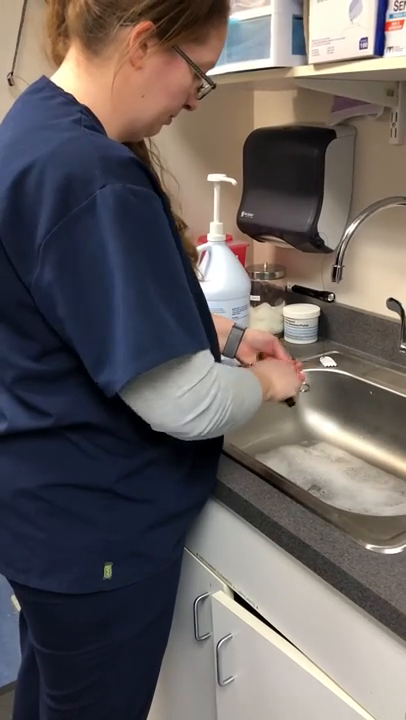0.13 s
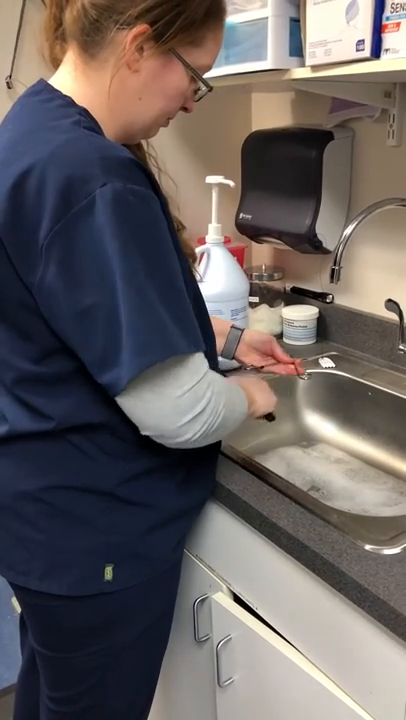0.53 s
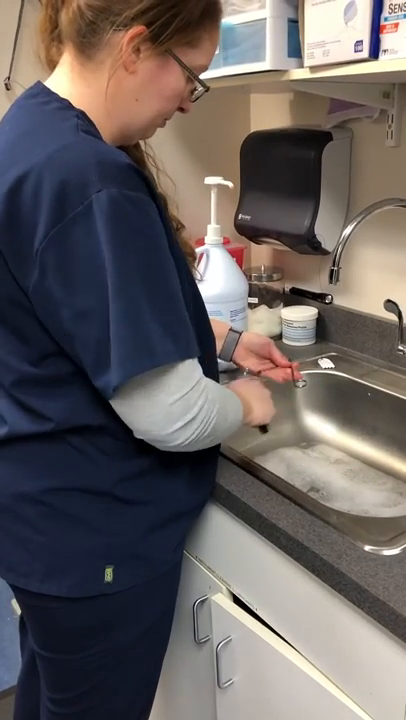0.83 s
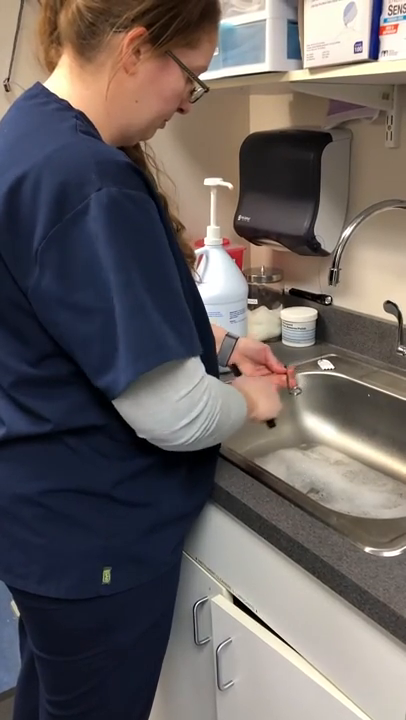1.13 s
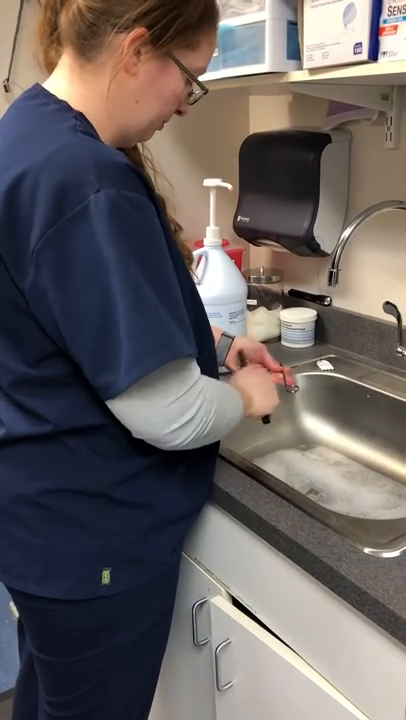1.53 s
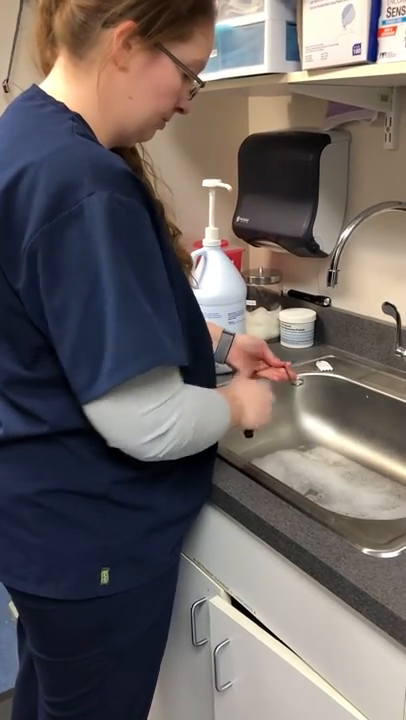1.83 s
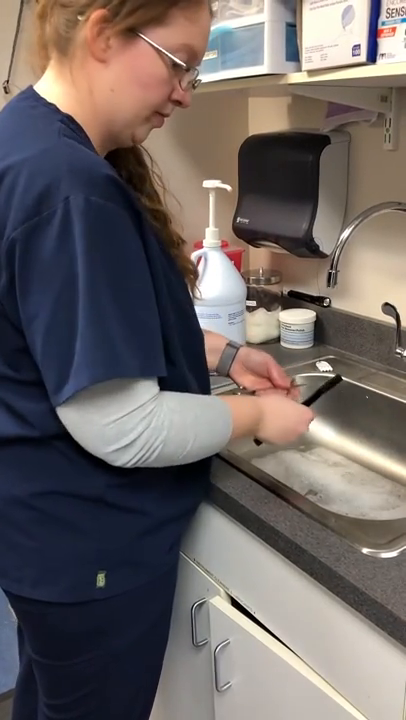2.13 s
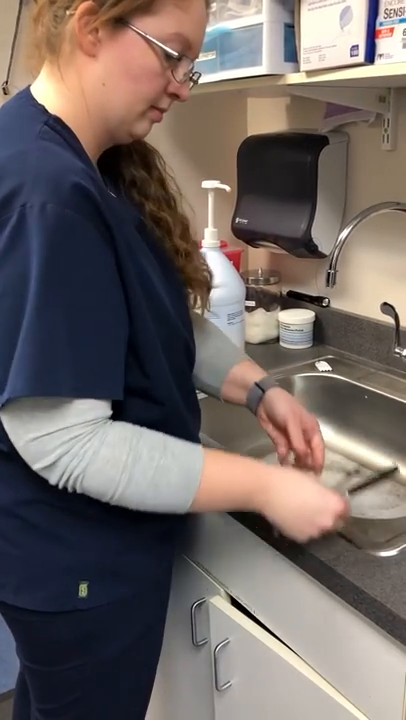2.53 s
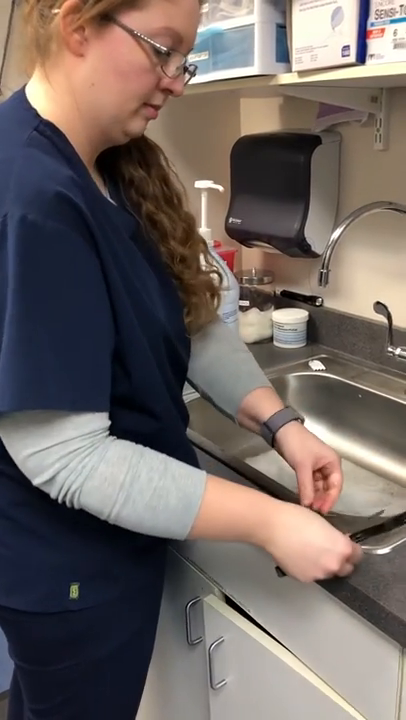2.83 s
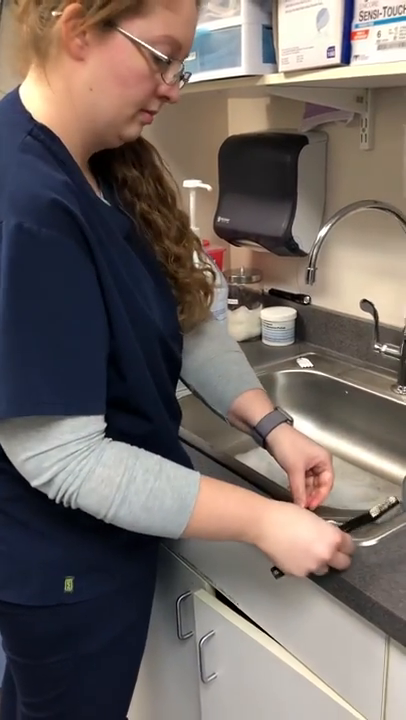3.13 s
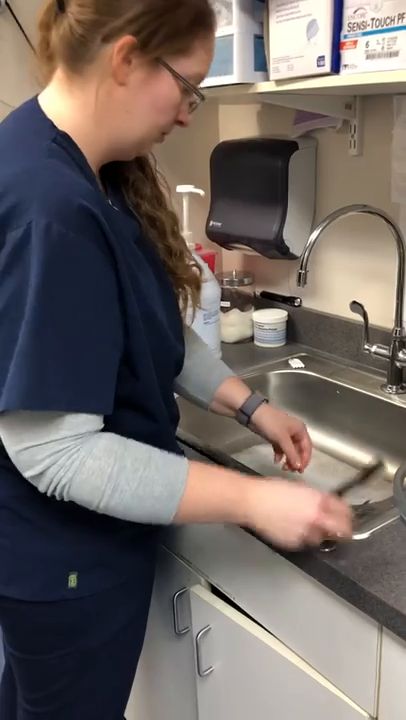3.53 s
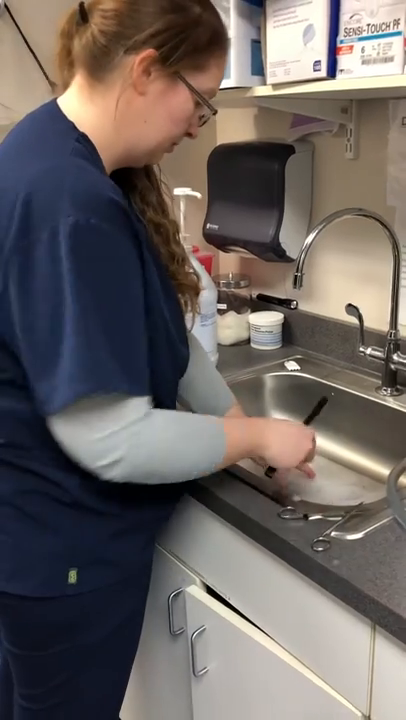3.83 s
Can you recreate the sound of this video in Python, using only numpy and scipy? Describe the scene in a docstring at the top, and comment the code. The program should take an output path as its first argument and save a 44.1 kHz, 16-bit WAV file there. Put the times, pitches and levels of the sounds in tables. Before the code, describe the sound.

Short raspy brush strokes on small metal, then a sharp ringing clatter beside a sink.

```python
"""In a small hard room with humming ventilation, a small steel instrument is scrubbed with a brush over a sink.
The brush is shaped noise: short bursts with a bristle resonance, light touches and dull taps.
Sleeves rustle as filtered noise; the instrument then clatters down on the counter beside the sink.
Its knocks are decaying noise bursts, with decaying sines for the ringing steel and sink."""
import sys
import numpy as np
from scipy import signal
from scipy.fft import rfft, irfft
from scipy.io import wavfile
from scipy.ndimage import uniform_filter1d

SR = 44100
rng = np.random.default_rng(int(sys.argv[2]) if len(sys.argv) > 2 else 0)


def output_pcm(signal):
    """Save a mono or channel-first signal as 16-bit PCM at the path in sys.argv[1].

    Samples are clipped to [-1, 1] before scaling.
    """
    pcm = np.clip(np.atleast_2d(signal).T, -1, 1) * 32767
    wavfile.write(sys.argv[1], SR, np.round(pcm).astype(np.int16))


N = 176400  # 4 seconds


def undb(db):
    """Decibels to gain."""
    return 10 ** (np.asarray(db) / 20)


def unit(x):
    """Scale to rms 1."""
    return x / np.sqrt(np.mean(x ** 2))


def decay(age, t60):
    """Exponential decay by 60 dB in t60 seconds."""
    return np.exp(-np.log(1000) * age / t60)


def fade(start, t60):
    """Sudden onset and exponential decay."""
    age = np.arange(N) / SR - start
    return (age >= 0) * decay(np.clip(age, 0, 10 * t60), t60)


def curve(rows):
    """Gain over time from (seconds, dB) points."""
    return undb(np.interp(np.arange(N) / SR, *np.array(rows).T))


def surges(depth_db, step_s):
    """A gain that wanders at random between points step_s apart, with rms 1."""
    steps = np.arange(N) / SR / step_s
    return unit(undb(depth_db * np.interp(steps, np.arange(N), rng.standard_normal(N))))


def colour(x, points):
    """Causal minimum-phase filter through (Hz, dB) points that keeps the power of white noise."""
    hz, db = np.array(points).T
    freqs = np.arange(N + 1) * SR / (2 * N)
    gain = unit(undb(np.interp(np.log(freqs + 1), np.log(hz), db)))
    # folding the cepstrum forward in time gives the minimum phase
    cepstrum = irfft(np.log(gain))
    cepstrum[1:N] *= 2
    cepstrum[N + 1:] = 0
    return irfft(rfft(x, 2 * N) * np.exp(rfft(cepstrum)))[:N]


def resonance(x, hz, q):
    """Band-pass with gain 1 at the centre."""
    return signal.lfilter(*signal.iirpeak(hz, q, fs=SR), x)


def room(x, wet_db):
    """Add one reflection from the wall behind the sink and a short tail whose treble dies first."""
    low_t60_s, treble_t60_s, onset_s = 0.24, 0.12, 0.0028
    wall_s, wall_db = 0.012, -16  # the reflection, in dB against the energy of the tail
    t = np.arange(SR // 2) / SR
    noise = rng.standard_normal(len(t))
    low = signal.sosfilt(signal.butter(2, 5000, fs=SR, output="sos"), noise)
    high = signal.sosfilt(signal.butter(2, 5000, "high", fs=SR, output="sos"), noise)
    build_up = 1 - np.exp(-(t / onset_s) ** 2)
    # the minus sign aligns the phases of the two bands at the crossover
    tail = (low * decay(t, low_t60_s) - high * decay(t, treble_t60_s)) * build_up
    tail /= np.sqrt(np.sum(tail ** 2))
    tail[int(wall_s * SR)] += undb(wall_db)
    return x + undb(wet_db) * signal.fftconvolve(x, tail)[:N]


# Wavering level of the fan hum. Each row: time in seconds, level in dB.
HUM_LEVEL = [(.08, -74), (.3, -57.5), (.65, -55), (1.14, -64), (1.35, -58.5), (1.75, -55.5), (2, -61),
             (2.2, -75), (2.45, -57.5), (2.9, -57), (3.28, -67), (3.55, -58.5), (4, -57)]
# Tone of the rushing air. Each row: frequency in Hz, relative density in dB per Hz.
AIR_SPECTRUM = [(24, -37), (32, -2), (42, -12), (58, 1), (76, -9.5), (110, 4), (160, -2), (300, -3),
                (410, -9.5), (510, -4), (600, -14), (800, -15.5), (1300, -20.5), (2500, -31), (6000, -32),
                (10000, -37.5), (16000, -40.5)]


def ventilation():
    """Steady rush of air as filtered noise, and a low fan hum with its octave, slightly unsteady in pitch."""
    hum_hz, pitch_drift, octave_db, air_db = 56.6, 0.009, -10.5, -57
    drift = unit(uniform_filter1d(rng.standard_normal(N), size=8000))
    phase = 2 * np.pi * np.cumsum(hum_hz * (1 + pitch_drift * drift)) / SR
    hum = np.sqrt(2) * (np.sin(phase) + undb(octave_db) * np.sin(2 * phase))
    air = undb(air_db) * colour(rng.standard_normal(N), AIR_SPECTRUM)
    return hum * curve(HUM_LEVEL) + air


# Swell of the sleeve rustle. Each row: time in seconds, level in dB before the flutter.
RUSTLE_LEVEL = [(0, -73), (.75, -68), (.97, -72.5), (1.05, -69.5), (1.8, -70.5), (2.12, -70), (2.29, -63),
                (2.55, -64.5), (2.76, -64), (2.98, -74.5), (3.5, -64), (3.72, -68), (3.86, -66), (4, -61)]
# Tone of the cloth. Each row: frequency in Hz, relative density in dB per Hz.
CLOTH_SPECTRUM = [(400, 5.5), (1000, 8), (2500, 5), (5000, 1), (7500, -6), (11000, -13), (16000, -16.5)]


def sleeves():
    """Soft cloth rubbing as the arms reach over: filtered noise with a fluttering level."""
    flutter_db = 0.86 * unit(uniform_filter1d(rng.standard_normal(N), size=500))
    cloth = colour(rng.standard_normal(N), CLOTH_SPECTRUM)
    return cloth * curve(RUSTLE_LEVEL) * undb(flutter_db)


def ring(modes, starts, levels_db):
    """Strike a set of modes; each blow meets them at a different spot, so their balance and pitch vary."""
    detune_ratio, spot_db = .002, 1.2
    age = np.arange(SR // 2) / SR
    hz, db, t60 = np.array(modes).T[:, :, None]
    out = np.zeros(N + SR)
    for start, level in zip(starts, levels_db):
        spot, turn, detune = rng.standard_normal((3, len(modes), 1))
        struck_hz = hz * (1 + detune_ratio * detune)
        waves = np.sin(2 * np.pi * (struck_hz * age + turn)) * decay(age, t60)
        i = int(start * SR)
        out[i:i + len(age)] += (undb(db + level + spot_db * spot) * waves).sum(0)
    return out[:N]


# Steel knocking on counter and sink rim, also played by clatter(). Each row: start in seconds,
# relative levels of thud, clack, click and ring in dB, clack resonance in Hz, click resonance in Hz.
STEEL_KNOCKS = [(3.0588, -25, -19, -15.5, -14.5, 3100, 12300), (3.078, -15, -31, -12.5, -10, 3000, 12400),
                (3.1047, -3, 4.5, 0, 2.5, 2340, 6900), (3.1166, 0, -6.5, 3, -7.5, 2370, 4080),
                (3.229, -21, -18, -39, -36, 2180, 5000), (3.3002, -11.5, -13, -14, -9, 2900, 5340),
                (3.3194, 1.5, 0, -13, -20, 2620, 9350), (3.325, 2.5, -12, -23, -27, 2650, 9600),
                (3.3426, -11.5, 2.5, -0.5, -8.5, 2300, 6260), (3.349, -5.5, -7.5, -6, -4.5, 2950, 8600),
                (3.3705, -1.5, 2, -25, -19, 2380, 5700), (3.3964, -11, -2.5, -14, -17, 2920, 7200),
                (3.4021, -11, -6.5, -30, -21, 1460, 4200), (3.5756, -9, -2.5, -17, -17.5, 2200, 4300),
                (3.77, -23, -22, -29, -43, 1900, 6500), (3.788, -40, -45, -30, -34, 2500, 6800),
                (3.817, -17.5, -11, -40, -45, 1520, 4200)]
# Ringing of the instrument. Each row: nominal frequency in Hz, relative level in dB, 60 dB decay in seconds.
BLADE_MODES = [(2400, -5, .1), (2780, -4, .26), (2945, 8, .16), (3063, -2, .19), (3200, -3, .18),
               (4457, -1, .1), (5570, -6, .14), (6045, 0, .13), (6202, 3, .15), (6428, 4, .13),
               (9030, 1, .08), (12010, -3, .06), (13310, -5, .06)]
# Ringing of counter and sink. Each row: nominal frequency in Hz, relative level in dB, 60 dB decay in seconds.
BASIN_MODES = [(310, -8, .2), (520, -7, .12), (595, -1, .1), (654, -4, .13), (690, -4, .13), (862, -4, .16),
               (919, -2, .13), (988, -8, .2), (1420, -8, .08)]


def rings():
    """Knocks ring the sink and two blades; the second is fainter and tuned a little higher, so they beat."""
    steel_db, sink_db = -50.5, -50.5
    blade_split, other_blade_db = 0.0053, -7  # pitch offset as a ratio
    at, thud, _, _, steel, _, _ = np.array(STEEL_KNOCKS).T
    other_modes = np.array(BLADE_MODES) * [1 + blade_split, 1, 1]
    blade = ring(BLADE_MODES, at, steel + steel_db)
    other_blade = ring(other_modes, at, steel + steel_db + other_blade_db)
    return blade + other_blade + ring(BASIN_MODES, at, thud + sink_db)


def contacts(chatter, starts, levels_db, centres_hz, t60, peak_db, q):
    """A short noise burst for each knock, coloured by the resonance of the spot that is struck."""
    out = np.zeros(N)
    fall = decay(np.arange(SR // 4) / SR, t60)
    for start, db, hz in zip(starts, levels_db, centres_hz):
        i = int(start * SR)
        count = min(len(fall), N - i)
        noise = rng.standard_normal(len(fall))[:count]
        burst = undb(db) * fall[:count] * chatter[i:i + count] * noise
        out[i:i + count] += burst + undb(peak_db) * resonance(burst, hz, q)
    return out


# Tone of the low thud. Each row: frequency in Hz, relative density in dB per Hz.
THUD_SPECTRUM = [(60, -26), (125, 0), (190, -15), (300, -7), (420, -7.5), (590, 3), (690, 0), (770, -8.5),
                 (930, -0.5), (1120, -12), (1400, -6.5), (2000, -19), (4000, -53)]
# Tone of the middle clack. Each row: frequency in Hz, relative density in dB per Hz.
CLACK_SPECTRUM = [(600, -19), (1300, 0), (1850, -7.5), (2300, -1.5), (3100, -2.5), (3500, -7), (5000, -6),
                  (8000, -14.5), (16000, -64)]
# Tone of the bright click. Each row: frequency in Hz, relative density in dB per Hz.
CLICK_SPECTRUM = [(1500, -31), (3800, -3), (5000, -3.5), (6200, 2), (8500, 1.5), (10500, -1.5), (13500, -8),
                  (16000, -5.5)]


def clatter():
    """Each knock thuds in the counter, clacks and clicks as the contact chatters in micro-bounces."""
    thud_db, clack_db, click_db = -36.5, -40, -40
    thud_t60_s, clack_t60_s, click_t60_s = 0.071, 0.053, 0.07
    at, thud, clack, click, _, clack_hz, click_hz = np.array(STEEL_KNOCKS).T
    chatter = surges(depth_db=3.5, step_s=0.0006)
    # overlapping thuds add in power
    thud_power = sum((undb(thud_db + db) * fade(s, thud_t60_s)) ** 2 for s, db in zip(at, thud))
    thuds = np.sqrt(thud_power) * chatter * rng.standard_normal(N)
    clacks = contacts(chatter, at, clack + clack_db, clack_hz, clack_t60_s, peak_db=3, q=3)
    clicks = contacts(chatter, at, click + click_db, click_hz, click_t60_s, peak_db=2, q=5)
    return colour(thuds, THUD_SPECTRUM) + colour(clacks, CLACK_SPECTRUM) + colour(clicks, CLICK_SPECTRUM)


def bristle_snaps():
    """Grainy noise of bristles snapping off the steel, surging as they let go in tufts."""
    scatter_db, hold = 1.5, 10  # each random level is held for 10 samples
    sizes = np.minimum(rng.exponential(size=N // hold + 1), 4)
    scatter = undb(scatter_db * np.repeat(sizes, hold)[:N])
    return unit(rng.standard_normal(N) * scatter) * surges(depth_db=2, step_s=.0015)


# Bristles sweeping over the metal. Each row: peak time in seconds, relative level in dB,
# half-length in seconds, brightness in dB per octave, bristle resonance in Hz.
BRUSH_SWEEPS = [(.001, -1.5, 0.0075, -1, 9500), (0.042, 1, 0.0037, 0, 9300), (0.221, -13, .0042, -3, 9500),
                (0.252, -6, 0.0091, -0.5, 3300), (.296, 3.5, 0.0037, 0, 6960),
                (0.522, -9.5, 0.0069, -2, 9350), (0.553, 0, 0.0048, .5, 6500), (0.581, 1, 0.0056, 0, 7800),
                (0.833, -2, 0.0056, 1.5, 11000), (0.858, -16, 0.02, -4.5, 9400),
                (0.876, 1, 0.0047, 2.5, 12000), (1.075, -9.5, .0055, -2.5, 9500),
                (1.128, 4, 0.0055, .5, 9800), (1.198, -9.5, 0.0088, -1, 9800), (1.415, 0, 0.0059, 0, 9500),
                (1.451, -2.5, 0.0077, -1, 9000), (1.729, -3.5, 0.0094, 2, 11500),
                (1.756, -10.5, 0.012, -4, 10000), (1.771, 2.5, 0.0033, 2, 14400)]
# The brush touching the metal before a stroke. Each row: start in seconds, relative level in dB.
BRUSH_TOUCHES = [(0.495, 3.5), (.784, 4), (1.364, 5), (1.675, 4.5)]
# The brush head slipping off the edge with a dull tap. Each row: start in seconds, relative level in dB.
EDGE_TAPS = [(0.291, 1), (0.574, 0), (0.833, -1), (1.129, -2), (1.774, 11)]
# Tone of sweeps and touches. Each row: frequency in Hz, relative density in dB per Hz.
BRISTLE_SPECTRUM = [(200, -16), (500, 2.5), (750, -0.5), (1500, -5), (2000, -3.5), (3200, 1.5), (4200, -2),
                    (7000, 0.5), (9500, 1.5), (12500, -2), (16000, 1.5)]


def brush():
    """Bristle noise swells and fades in each sweep with its own tilt and resonance, among touches and taps."""
    sweep_db, sweep_shape = -48.5, 1.35  # a shape of 2 would be a Gaussian bump
    peak_db, peak_width_octaves = 4.5, .17
    touch_db, touch_t60_s = -60, 0.044
    tap_db, tap_t60_s = -46, 0.078
    t = np.arange(N) / SR
    snaps = bristle_snaps()
    # the tilt turns about 8 kHz and is flat below 1 kHz
    octaves = np.log2(np.maximum(np.arange(N // 2 + 1) * SR / N, 1000) / 8000)
    freqs = np.arange(1, N // 2 + 2) * SR / N  # starts one bin up to avoid log of zero
    bristles = np.zeros(N)
    for at, db, half, bright, hz in BRUSH_SWEEPS:
        pressure = np.exp(-.5 * np.minimum(np.abs((t - at) / half) ** sweep_shape, 20))
        tint_db = peak_db * np.exp(-.5 * (np.log2(freqs / hz) / peak_width_octaves) ** 2)
        tone_db = sweep_db + db + bright * octaves + tint_db
        bristles += irfft(rfft(snaps * pressure) * undb(tone_db), N)
    for at, db in BRUSH_TOUCHES:
        bristles += snaps * undb(touch_db + db) * fade(at, touch_t60_s)
    tap_level = sum(undb(tap_db + db) * fade(at, tap_t60_s) for at, db in EDGE_TAPS)
    taps = resonance(rng.standard_normal(N) * tap_level, hz=665, q=2.6)
    return colour(bristles, BRISTLE_SPECTRUM) + taps


def scene():
    """Brush, clatter and ringing steel in the room, over cloth and ventilation."""
    background = ventilation() + sleeves()
    knocks = room(rings(), wet_db=-6) + room(clatter(), wet_db=-3)
    scrubbing = room(brush(), wet_db=-7.5)
    return (background + knocks + scrubbing)[None]


def record(dry):
    """Cut the top steeply above 15.9 kHz with an elliptic low-pass."""
    return signal.sosfilt(signal.ellip(10, .2, 70, 15900, fs=SR, output="sos"), dry)


dry = scene()
out = record(dry)
output_pcm(out)
```